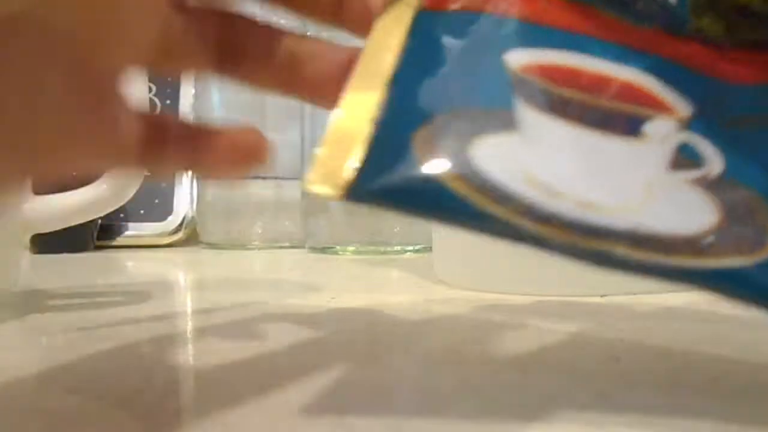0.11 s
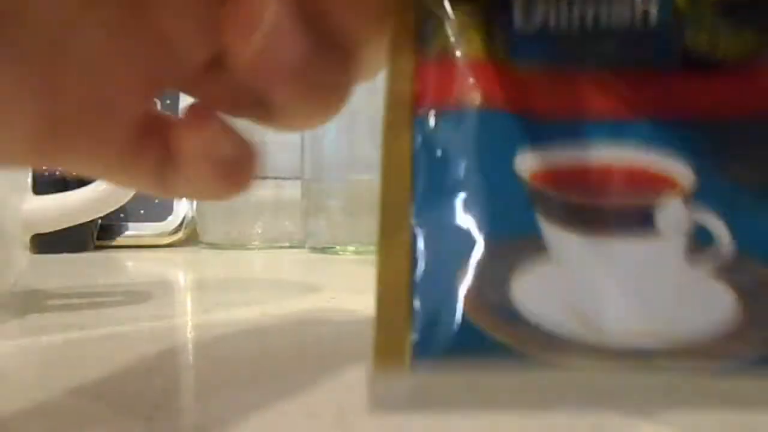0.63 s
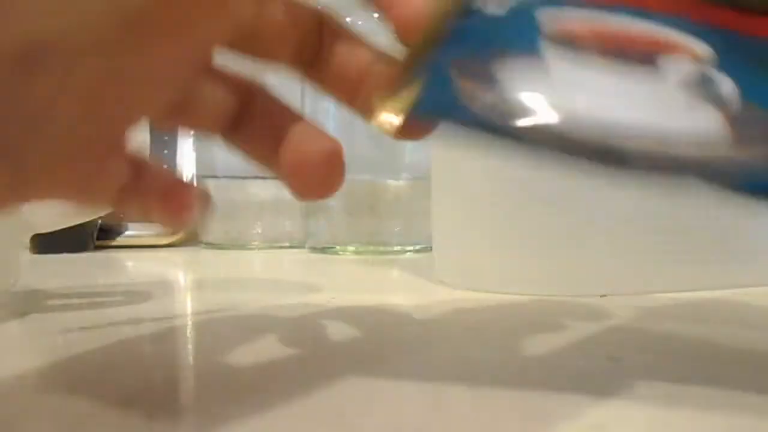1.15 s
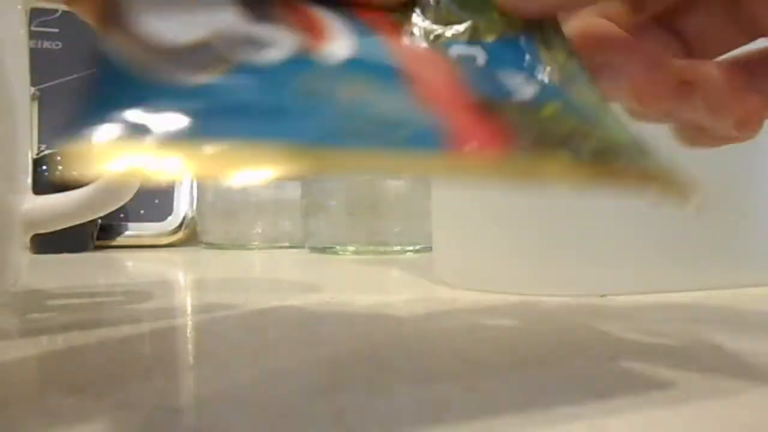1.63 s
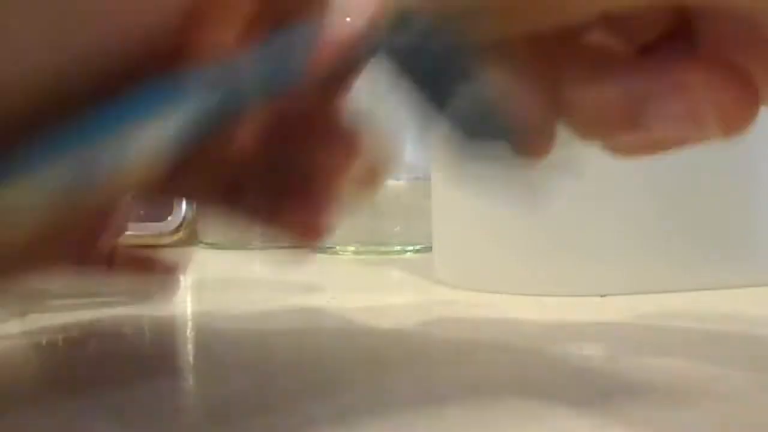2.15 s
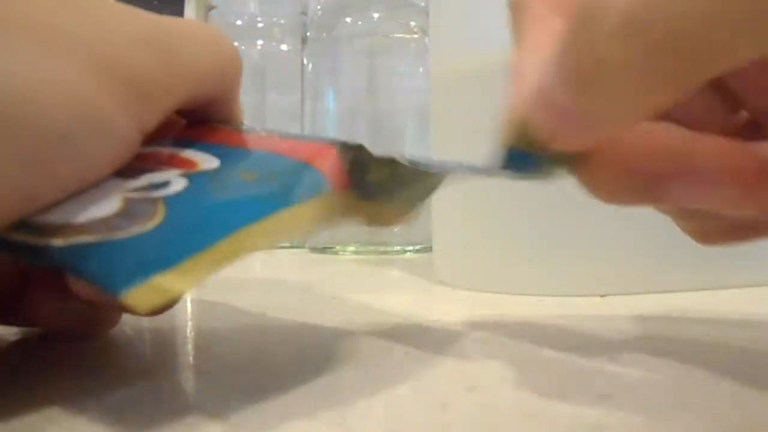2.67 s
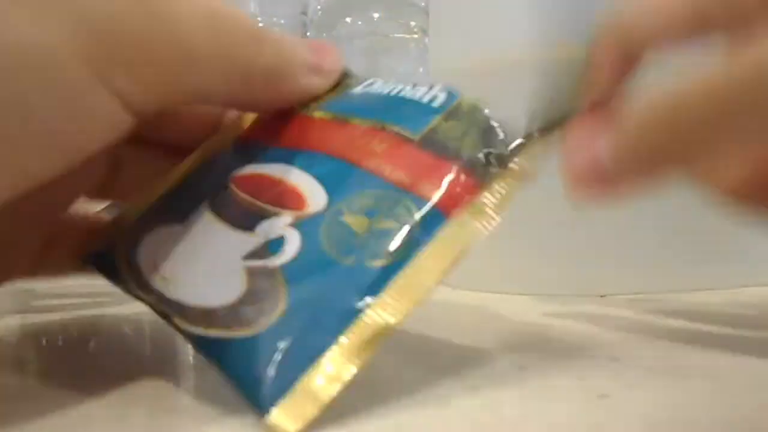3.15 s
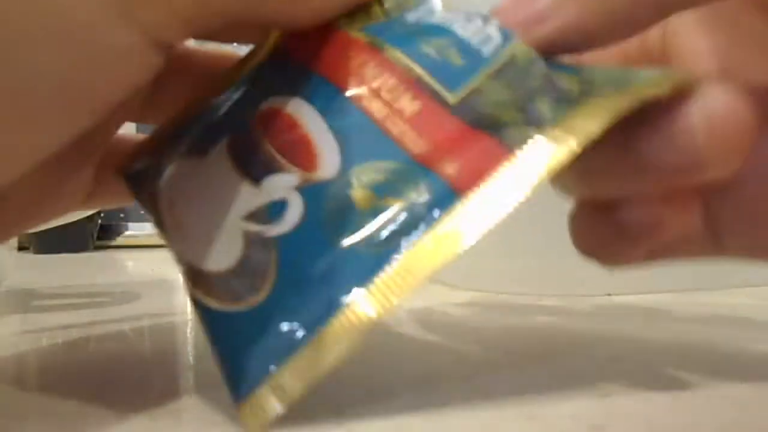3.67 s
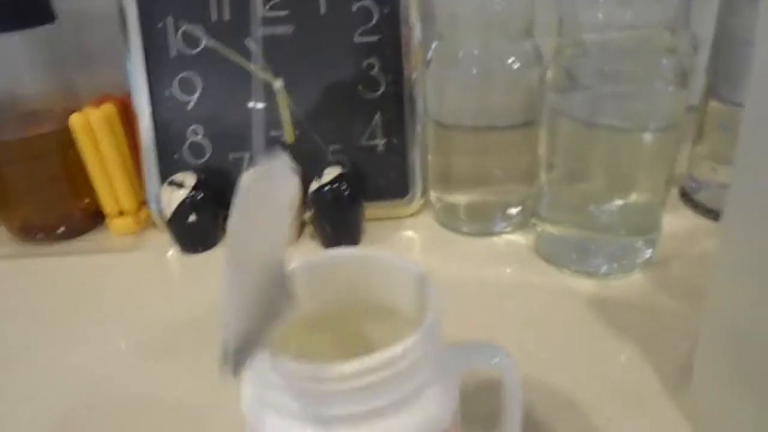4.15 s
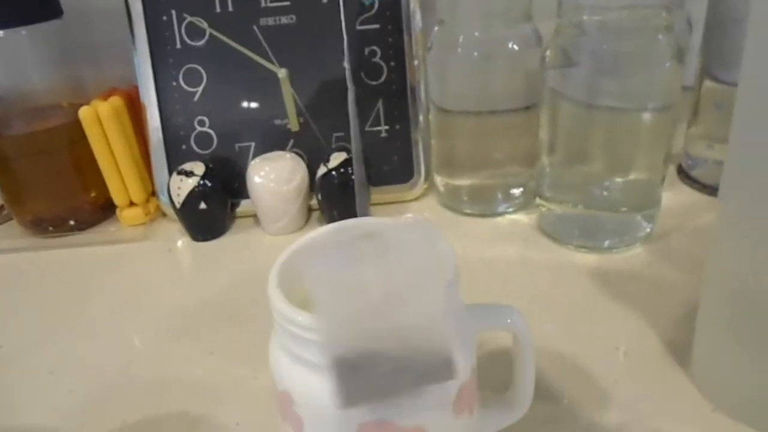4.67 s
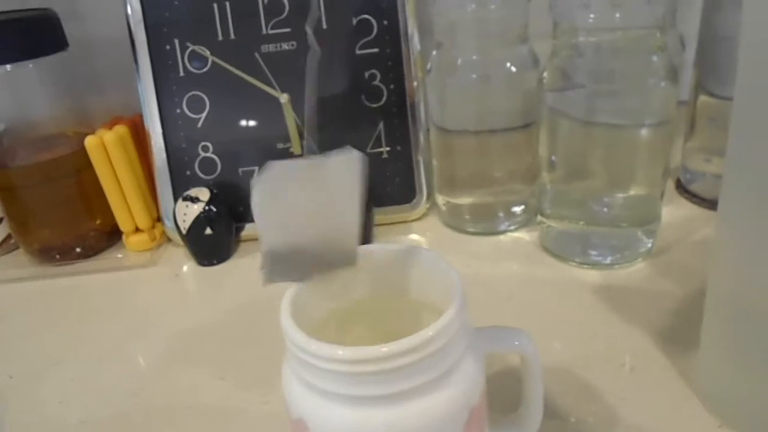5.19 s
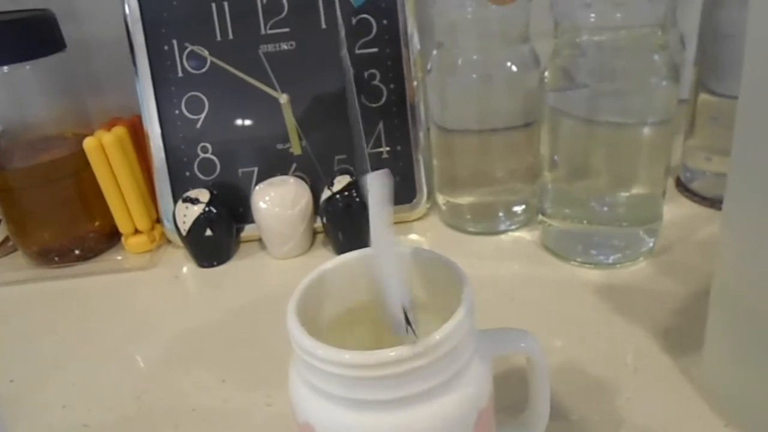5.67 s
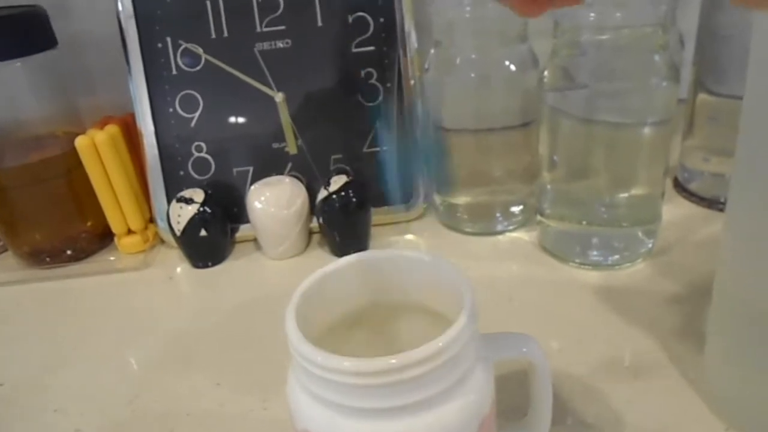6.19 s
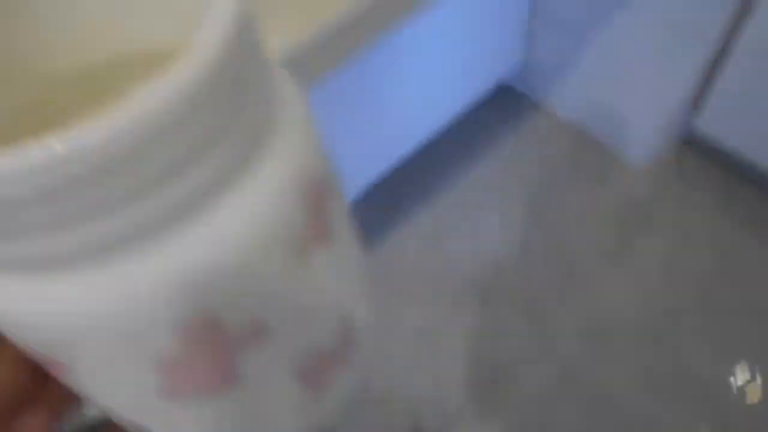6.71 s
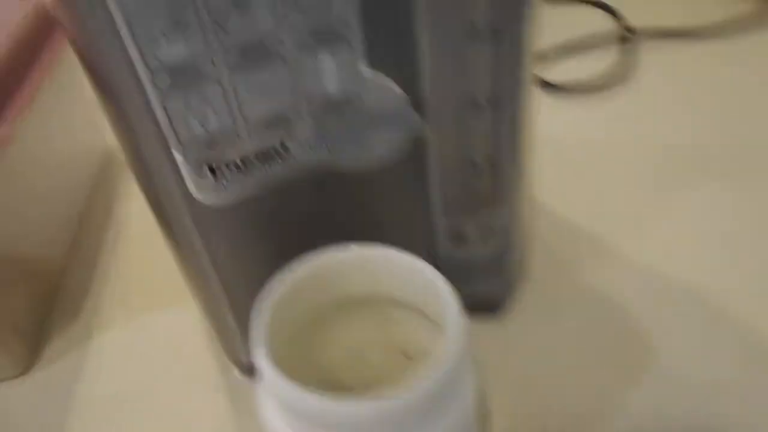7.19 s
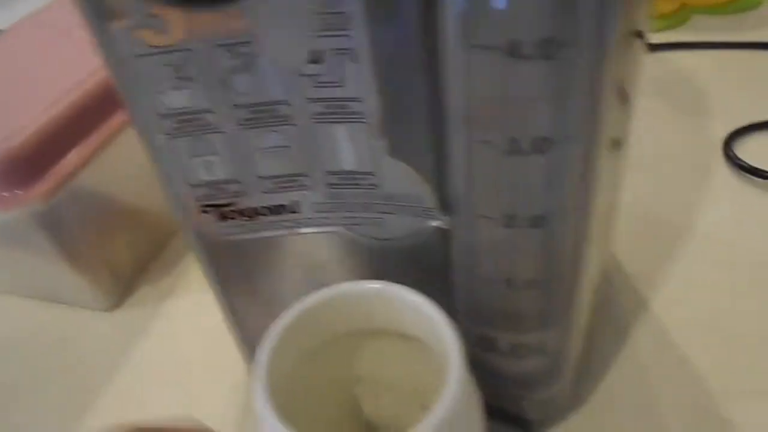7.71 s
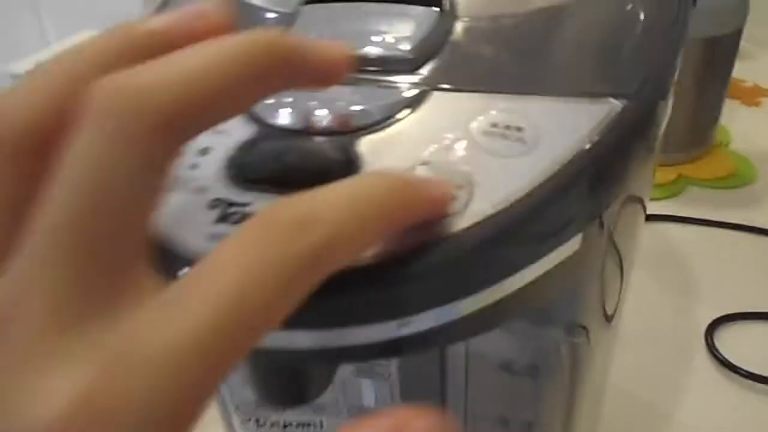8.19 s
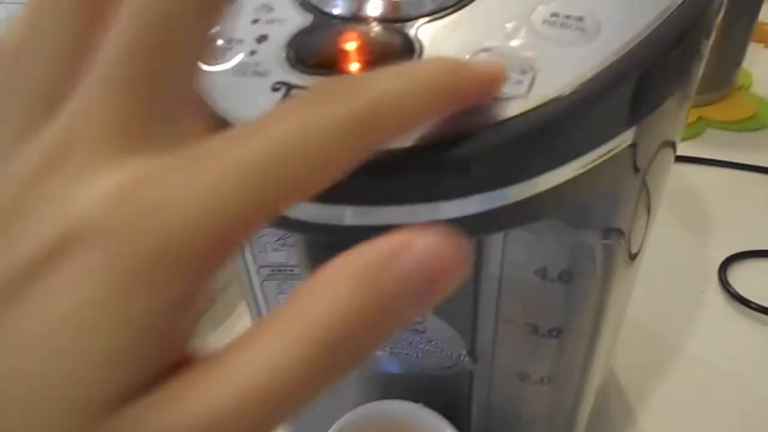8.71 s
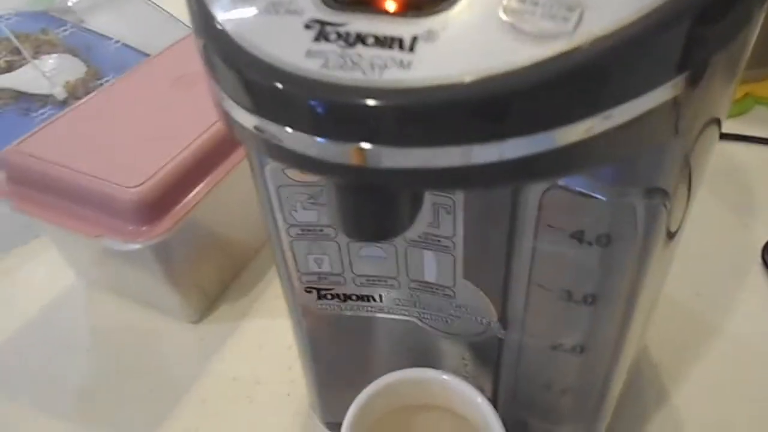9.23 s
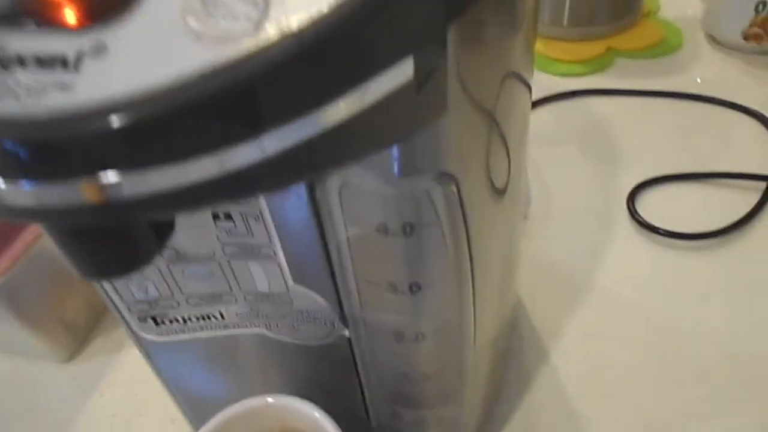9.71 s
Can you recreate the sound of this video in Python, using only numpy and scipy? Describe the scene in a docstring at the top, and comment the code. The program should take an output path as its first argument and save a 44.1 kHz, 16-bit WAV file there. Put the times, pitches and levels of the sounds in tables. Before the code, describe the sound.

Handheld close recording: dense, snapping foil crackles dominate the first half, ending in tearing bursts. A muffled thud from next door blooms and fades. Then it is mostly quiet room hiss, with light brushing, a pair of crisp tag ticks against a mug, a loud ceramic clack on the counter at arm's length, small button clicks, and a gritty mug slide ending in a double knock, with short tiled-room reverb.

```python
"""First a steady hiss over fridge hum in a tiled kitchen, then a foil packet of tea turned and torn at the microphone.
Creases snap as short coloured noise bursts over a smeared rustle; a dull noise swell is a knock in the next room.
Then a paper tag ticks into a stoneware mug, which is set down, rocks and slides: struck and ground resonances.
Buttons click as small bursts, a clock rattles its case, and a decaying noise tail gives the hard-walled room."""
import sys
import numpy as np
from scipy import signal
from scipy.fft import rfft, irfft
from scipy.io import wavfile
from scipy.ndimage import uniform_filter1d

SR = 44100
rng = np.random.default_rng(int(sys.argv[2]) if len(sys.argv) > 2 else 0)


def undo_db(level):
    """Turn decibels back into plain size, where 20 dB means ten times bigger."""
    steps = np.asarray(level, float) / 20
    return 10 ** steps


def to_wav(sig):
    """Store sig (one row per channel, or 1-D mono) as 16-bit WAV at the path in sys.argv[1].

    Samples outside -1..1 are clipped; the rate is SR.
    """
    pcm = np.clip(np.atleast_2d(sig), -1, 1) * 32767
    pcm = np.round(pcm).astype(np.int16)
    wavfile.write(sys.argv[1], SR, pcm.T)  # frames by channels


N = 434385
T = np.arange(N) / SR


def colour(x, points):
    """Shape the spectrum along the last axis by (frequency [Hz], level [dB]) points."""
    hz, db = np.transpose(points)
    f = np.fft.rfftfreq(x.shape[-1], 1 / SR) + 1
    gain = undo_db(np.interp(np.log(f), np.log(hz), db))
    return irfft(rfft(x) * gain, x.shape[-1])


def unit(x):
    """Scale to rms 1."""
    return x / np.sqrt(np.mean(x ** 2))


def band(x, hz, width):
    """Pass one resonance, its centre and width in Hz."""
    return signal.lfilter(*signal.iirpeak(hz, hz / width, SR), x)


def gains(spans):
    """Gain per sample for each dB column of a list of (time, dB, ..) tables; -200 dB outside each."""
    out = 0
    for rows in spans:
        s, *columns = np.transpose(rows)
        out = out + np.array([undo_db(np.interp(T, s, c, left=-200, right=-200)) for c in columns])
    return out


def swells(rows):
    """Gain per sample for each dB column of (start, length, dB, ..) rows: every stroke swells and fades."""
    out = 0
    for s, length, *db in rows:
        stroke = np.sin(np.pi * np.clip((T - s) / length, 0, 1)) ** 2
        out = out + stroke * undo_db(np.array(db))[:, None]
    return out


def place(times, sounds):
    """Lay short sounds on the time line."""
    out = np.zeros(N + sounds.shape[1])
    for s, sound in zip(times, sounds):
        out[int(s * SR):int(s * SR) + len(sound)] += sound
    return out[:N]


def place_at_peaks(times, peaks_db, sounds):
    """Lay short sounds on the time line, each scaled to its own peak level."""
    scale = undo_db(peaks_db) / abs(sounds).max(axis=1)
    return place(times, sounds * scale[:, None])


def ring(modes, x):
    """Excite decaying (Hz, dB, t60) modes; neighbours swing in opposite directions."""
    out = 0
    for k, (hz, db, t60) in enumerate(modes):
        pole = np.exp(2j * np.pi * hz / SR - np.log(1000) / (t60 * SR))
        mode = signal.lfilter([1, -1], [1, -pole], x).imag / abs(1 - pole)
        out = out + (-1) ** k * undo_db(db) * mode
    return out


def grit(rate, scatter_db):
    """Random clicks, rate per second, of widely spread but bounded size, rms 1."""
    chance = rng.random((N, 2)).T
    size = np.minimum(-np.log(1 - chance[1]), 3)
    sign = np.sign(rng.standard_normal(N))
    return unit((chance[0] < rate / SR) * undo_db(scatter_db * size) * sign)


# Spectrum of the room hiss: (frequency [Hz], level [dB])
HISS_COLOUR = [(12, -38), (20, 12), (43, -20.5), (92, 4.5), (213, -3.5), (401, -2.5), (679, -7.5),
               (861, -4), (1280, -6.5), (2600, -12), (3800, -10.5), (6000, -13.5), (9400, -14),
               (10300, -22)]
# Hiss over time: (time [s], level [dB], treble against bass [dB])
HISS_LEVELS = [(0, -55, 4), (1.3, -61, -13), (1.7, -59, -2.5), (3.4, -58.5, -2), (4, -58, 6), (4.6, -59, 2),
               (6.402, -62, 6.5), (7.9, -61.5, 1.5), (9.85, -56, -1.5)]


def hiss():
    """Steady coloured noise whose level and treble, split gently around 1.5 kHz, drift."""
    s, level_db, treble_db = np.transpose(HISS_LEVELS)
    noise = unit(colour(rng.standard_normal(N), HISS_COLOUR))
    bass = signal.lfilter(*signal.butter(1, 1500, fs=SR), noise)
    treble = undo_db(np.interp(T, s, treble_db)) * (noise - bass)
    return undo_db(np.interp(T, s, level_db)) * (bass + treble)


# Fridge resonances: (frequency [Hz], width [Hz], level early on [dB], level later [dB])
FRIDGE = [(88.4, 11, -69, -76.5), (397, 15, -69.5, -74.5), (488, 25, -77, -69.5),
          (289.4, 35.8, -75.5, -68.5), (4740, 290, -71.5, -71)]
# The hum moves from its early to its later balance: (start [s], end [s])
HUM_SHIFT_S = (6, 7.1)


def fridge():
    """Narrow noise resonances whose levels shift from the early balance to the later one."""
    out = 0
    for hz, width, early_db, later_db in FRIDGE:
        level = undo_db(np.interp(T, HUM_SHIFT_S, (early_db, later_db)))
        out = out + level * unit(band(rng.standard_normal(N), hz, width))
    return out


# The phone moving in the hand: (start [s], length [s], top level [dB])
RUMBLE = [(3.98, 0.44, -53.5), (4.35, .5, -61), (5.28, 0.19, -69), (6.75, .2, -62), (7.18, 0.2, -58)]


def hand_rumble():
    """Noise passed twice through a 25 Hz resonance, swelling with each movement of the hand."""
    return swells(RUMBLE)[0] * unit(band(band(rng.standard_normal(N), 25, 37.4), 25, 37.4))


# Hard-walled kitchen: (frequency [Hz], decay by 60 dB [s])
KITCHEN_T60 = [(200, 1), (530, 0.43), (1400, 0.69), (3700, 0.29), (9700, 0.14)]


def kitchen(x):
    """Diffuse tail of hard walls, each band of noise dying at its own rate, the top soonest."""
    t, tail = np.arange(SR) / SR, 0
    known_hz, known_t60 = np.transpose(KITCHEN_T60)
    for hz in 125 * 2 ** np.arange(0, 6.6, .5):
        t60 = np.interp(np.log(hz), np.log(known_hz), known_t60)
        tail = tail + band(rng.standard_normal(SR), hz, hz / 3) * undo_db(-60 * t / t60)
    tail *= 1 - np.exp(-t / 0.0018)  # soft onset
    return signal.fftconvolve(x, tail / np.sqrt(np.sum(tail ** 2)))[:N]


KNOCK_S, KNOCK_DB, KNOCK_T60_S = 4.013, -29, 0.64
# Spectrum of the knock next door: (frequency [Hz], level per Hz [dB])
KNOCK_COLOUR = [(35, -39), (60, -14), (140, -11), (194, -19.5), (500, -8.5), (606, -16), (749, -7),
                (1240, -20), (1820, -24), (6000, -40), (7800, -38), (13200, -120)]


def knock():
    """Heard through a doorway: dull noise enters at half strength, swells and dies with the far room."""
    t = np.clip(T - KNOCK_S, 0, None)
    shape = (t > 0) * (1 - .5 * np.exp(-t / 0.045)) * undo_db(-60 * t / KNOCK_T60_S)
    return undo_db(KNOCK_DB) * shape * unit(colour(rng.standard_normal(N), KNOCK_COLOUR))


# Clock ticks: (time [s], peak level [dB])
CLOCK_TICKS = [(4.463, -39.5), (5.465, -38), (6.44, -37)]
# Plastic clock case: (frequency [Hz], level [dB], decay by 60 dB [s])
CLOCK_MODES = [(1950, -3, .01), (3600, -1, .01), (4900, -3, .008), (6000, -6, .006)]


def clock():
    """A wall clock's step rattles a few short resonances of its plastic case."""
    s, db = np.transpose(CLOCK_TICKS)
    t = np.arange(3000) / SR
    rattle = np.exp(-t / 0.0056) * rng.standard_normal((len(s), len(t)))
    return place_at_peaks(s, db, ring(CLOCK_MODES, rattle))


# A thin ring that swells and fades: (start [s], length [s], top level [dB], frequency [Hz])
THIN_RING = [(6.44, 0.26, -61, 6130), (8.48, 0.17, -60.5, 5930)]


def thin_ring():
    """A narrow wavering band near 6 kHz: slow noise on a cosine and a sine."""
    flutter = unit(uniform_filter1d(rng.standard_normal((2, N)), 150))
    out = 0
    for s, length, db, hz in THIN_RING:
        phase = 2 * np.pi * hz * T
        tone = flutter[0] * np.cos(phase) + flutter[1] * np.sin(phase)
        out = out + swells([(s, length, db)])[0] * tone
    return out


# Edges of the four bands that colour a snap [Hz]
BAND_EDGES_HZ = np.array([300, 1500, 3500, 6500, 10000])


def snaps(rows, rise_s, fall_s, tail_s, tail_db):
    """Each snap builds up and flips in a ragged burst, longer for a big one, then flutters on briefly."""
    rows, lead = np.array(rows), 256 / SR
    t = np.arange(2048) / SR - lead
    # falls and tails last as given at a 0 dB peak
    after = np.clip(t, 0, None) / undo_db(0.16 * rows[:, 1:2])
    fall = np.exp(-after / fall_s) + undo_db(tail_db) * np.exp(-after / tail_s)
    shape = np.where(t < 0, np.exp(-abs(t) / rise_s), fall)
    bursts = shape * rng.standard_normal((len(rows), len(t)))
    centre = np.sqrt(BAND_EDGES_HZ[1:] * BAND_EDGES_HZ[:-1])
    # the 3.5-6.5 kHz band is the 0 dB reference
    per_hz = np.insert(rows[:, 2:], 2, 0, axis=1) - 10 * np.log10(np.diff(BAND_EDGES_HZ))
    bursts = np.array([colour(b, [(120, d[0] - 18), *zip(centre, d)]) for b, d in zip(bursts, per_hz)])
    return place_at_peaks(rows[:, 0] - lead, rows[:, 1], bursts)


# Small ticks of tag, string, fingers and buttons: (time [s], peak level [dB], then against 3.5-6.5 kHz:
# 300-1500 Hz [dB], 1.5-3.5 kHz [dB], 6.5-10 kHz [dB])
TICKS = [(4.5162, -30.5, -3, -14, -3), (4.602, -36, -11, -2, 3), (6.279, -12.5, -18, -13.5, 6),
         (6.3599, -8, -20, -8, 19), (8.2424, -41, -5, -5, 12), (8.2771, -42, 1, 8, 7),
         (8.33, -39.5, -4, -1, -12), (8.5969, -37, -14, 1, -4.5), (8.6219, -28, -8, 5, -5),
         (8.6349, -23.5, 0, -18, 4), (8.6482, -30.5, 2.5, -1, -3), (8.7529, -15.5, -3.5, -14, 8.5),
         (8.8888, -28, -22, 2, 2), (9.553, -30.5, -20, -19, 10), (9.558, -43, -20, -15, 9),
         (9.563, -39, -19, -12, 19), (9.568, -33, -25, -7, 5)]


def small_ticks():
    """Light contacts, each a short coloured noise burst with a fluttering tail."""
    return snaps(TICKS, rise_s=0.00068, fall_s=0.00166, tail_s=0.0061, tail_db=-12.5)


# Stoneware mug wall: (frequency [Hz], level [dB], decay by 60 dB [s])
MUG = [(3165, 0, .15), (3292, 0, .2), (7727, 0, .14), (7919, -18, .12), (7330, -19, .2), (7830, 0, .045),
       (8930, -8, .13)]
# Counter top under the mug: (frequency [Hz], level [dB], decay by 60 dB [s])
COUNTER = [(400, -20, .015), (569, 7, 0.026), (700, -4.5, 0.0085), (830, 6, 0.011), (1080, 4.5, .025),
           (1183, 5, .022), (1448, 0.5, 0.021), (1680, 3.5, .018), (1904, -2.5, 0.024), (2085, 4, .028),
           (2450, -25, .01), (2760, -26, .008)]
# Blows on the mug: (time [s], peak level of the counter [dB], drive of the first wall mode [dB],
# of the second [dB], of the 7.7 and 7.9 kHz pair [dB], of the other three [dB])
BLOWS = [(6.28, -50, -46, -45, -57, -34), (6.358, -55, -53, -53, -44, -41),
         (7.251, -0.5, -40, -21.5, -9.5, -47), (7.2994, -8, -36, -51, -30, -54),
         (7.327, -39, -52, -62, -47, -63), (7.341, -29, -53, -62, -37, -61),
         (7.411, -22, -57, -51, -34, -57), (7.427, -22.5, -54, -56, -41, -54),
         (7.446, -10.5, -40, -37, -25, -51), (9.654, -16.5, -37, -58, -50.5, -27.5),
         (9.661, -10, -37, -42, -52, -27), (9.682, -17, -33.5, -58, -55, -55)]


def mug_blows():
    """Each blow rattles the counter and taps the wall, later ones crack; its row balances the modes."""
    rows, t = np.array(BLOWS), np.arange(12000) / SR
    # the heavy counter takes the blow and keeps rattling
    rattle = np.exp(-t / 0.004) * rng.standard_normal((len(rows), len(t)))
    counter = place_at_peaks(rows[:, 0], rows[:, 1], ring(COUNTER, undo_db(24.5) * (t == 0) + rattle))
    # the hard wall gets one clean tap
    groups = MUG[:1], MUG[1:2], MUG[2:4], MUG[4:]
    taps = np.array([ring(modes, 1. * (t == 0)) for modes in groups])
    wall = place(rows[:, 0], undo_db(rows[:, 2:]) @ taps)
    # from the third blow on, a crack 20 dB under the counter's peak
    cracks = [(s + 0.00072, db - 20, 6, 4, -4) for s, db, *_ in BLOWS[2:]]
    return counter, wall, snaps(cracks, rise_s=0.00033, fall_s=0.0014, tail_s=.003, tail_db=-18)


# Mug grinding on its foot: (start [s], length [s], top level of the counter [dB],
# of the first wall mode [dB], of the 7.83 kHz wall mode [dB])
SLIDE = [(6.764, 0.11, -86, -64, -84), (6.892, 0.047, -69, -58.5, -63), (7.395, 0.058, -30, -61, -37.5),
         (7.804, 0.064, -72, -64, -80), (9.146, 0.076, -43, -64, -56), (9.181, 0.041, -33, -60.5, -49),
         (9.212, 0.055, -38.5, -54, -55), (9.275, 0.073, -69, -70, -67), (9.396, 0.034, -48.5, -81, -54),
         (9.414, 0.12, -50.5, -73, -50.5), (9.522, 0.072, -55, -48.5, -53), (9.605, 0.076, -52, -62, -52)]


def mug_slide():
    """The foot grinds softly: gritty force, holding little outside the modes it drives."""
    slide = []
    for level, modes, hz in zip(swells(SLIDE), [COUNTER, MUG[:1], MUG[5:6]], [950, MUG[0][0], MUG[5][0]]):
        force = band(band(grit(1500., 1.9), hz, hz), hz, hz)
        slide.append(ring(modes, level * force) / np.std(ring(modes, force)))
    return slide[0], slide[1] + slide[2]


def mug():
    """Blows and grinding ring the same wall and counter modes; a thin top radiates no deep bass."""
    counter, wall, cracks = mug_blows()
    counter_slide, wall_slide = mug_slide()
    no_bass = signal.butter(2, 230, "high", fs=SR, output="sos")
    return signal.sosfilt(no_bass, counter + counter_slide), wall + wall_slide, cracks


# Soft brushing of paper and fingers: (start [s], length [s], top level [dB])
BRUSH = [(4.42, 0.14, -53.5), (5.3, 0.084, -56.5), (5.52, 0.069, -58), (5.64, .12, -58.5),
         (5.89, 0.047, -54.5), (8.17, 0.1, -58.5)]


def brushing():
    """Widely uneven high grit that swells and fades with each stroke."""
    brush = band(band(grit(3500.0, 7.2), 9700, 4000), 7600, 5000)
    return swells(BRUSH)[0] * unit(brush)


# Resonances of the held packet: (frequency [Hz], width [Hz], level [dB])
HOLLOW = [(2050, 240, -6.5), (3360, 1000, -7)]
# Hiss in the hollow over time: (time [s], level [dB])
HOLLOW_LEVELS = [(.45, -78), (.6, -48.5), (.9, -51), (1.05, -48), (1.15, -81)]


def hollow_air():
    """Air hissing in the hollow of the held packet: noise through two resonances."""
    air = 0
    for hz, width, db in HOLLOW:
        air = air + undo_db(db) * unit(band(band(rng.standard_normal(N), hz, width), hz, width))
    return gains([HOLLOW_LEVELS])[0] * air


# Foil sliding between fingers: (time [s], level [dB], level of the low puffs [dB])
RUSTLE = [(0.3, -80, -59.5), (0.51, -50.5, -53), (0.81, -54.5, -56.5), (1.07, -50, -55.5),
          (1.23, -52.5, -70.5), (1.42, -48.5, -53), (1.6, -60.5, -77.5), (1.8, -52, -71),
          (2.05, -55.5, -62.5), (2.26, -53, -68), (2.5, -54.5, -62), (2.7, -44, -54), (2.93, -66.5, -96),
          (3.18, -40.5, -55), (3.33, -91, -90), (3.59, -68, -69), (3.74, -55.5, -57), (4.0, -70, -83)]
# Fists of foil crushed at once: (start [s], length [s], level [dB], level of the low puffs [dB])
CRUMPLES = [(0.217, 0.098, -51, -61), (0.786, 0.048, -53, -64), (1.096, 0.054, -42.5, -43.5),
            (1.136, 0.033, -28.5, -42), (1.261, 0.028, -47.5, -58), (1.542, 0.041, -42.5, -52.5),
            (1.901, 0.025, -35, -47), (2.02, 0.036, -42.5, -47.5), (2.178, 0.06, -35.5, -41.5),
            (2.425, 0.012, -30.5, -44), (2.685, 0.043, -40, -70), (3.1, 0.012, -23.5, -43.5),
            (3.234, 0.059, -48, -53.5), (3.55, 0.055, -45, -56), (3.608, 0.089, -40.5, -57.5),
            (3.91, 0.018, -43.5, -51), (3.945, 0.027, -33, -51)]
# Spectrum of the creasing foil: (frequency [Hz], level [dB])
FOIL = [(400, -7.5), (1500, -1.5), (3500, 9), (6000, 10), (7000, 9), (9300, 11), (10300, -1)]


def rustle():
    """Dense tiny creases between the loud ones, smeared by the sheet; the air inside puffs lower."""
    crushed = gains([[(s, a, b), (s + length, a, b)] for s, length, a, b in CRUMPLES])
    high, low = gains([RUSTLE]) + uniform_filter1d(crushed, size=300)
    smear = signal.lfilter([1], [1, -np.exp(-1 / (0.001 * SR))], abs(grit(1700.0, 2.1)))  # 1 ms decay
    creases = smear * rng.standard_normal(N)
    puffs = band(band(grit(1500., 2.3), 970, 2400), 480, 2500)
    return high * unit(colour(creases, FOIL)) + low * unit(puffs)


# Bouts of handling: (start [s], length [s], usual peak level of a small snap [dB])
BOUTS = [(0.24, 0.038, -41), (0.482, 0.1, -28), (0.65, 0.22, -23), (1.084, 0.11, -38), (1.309, 0.16, -23),
         (1.757, 0.23, -21.5), (1.977, 0.32, -22.5), (2.527, 0.24, -31), (3.109, 0.13, -21),
         (3.62, 0.1, -28.5), (3.757, 0.23, -29)]
# Usual colour of a small snap against 3.5-6.5 kHz: (300-1500 Hz [dB], 1.5-3.5 kHz [dB], 6.5-10 kHz [dB])
SMALL_BANDS_DB = (-11, -3, -0.5)
SMALL_PER_S, SMALL_LEVEL_SCATTER_DB, SMALL_BAND_SCATTER_DB = 50, 4.5, 5.5


def small_snaps():
    """Rows of chance snaps inside the bouts of handling, scattered in level and colour."""
    rows = []
    when, chance = rng.random((len(BOUTS), 20)), rng.standard_normal((len(BOUTS), 20, 4))
    for (s, length, db), u, c in zip(BOUTS, when, chance):
        count = round(SMALL_PER_S * length)
        peak_db = db + SMALL_LEVEL_SCATTER_DB * c[:, 0]
        bands_db = SMALL_BANDS_DB + SMALL_BAND_SCATTER_DB * c[:, 1:]
        rows += list(np.c_[s + length * u, peak_db, bands_db][:count])
    return rows


# Loud creases snapping close to the microphone: (time of the peak [s], peak level [dB],
# then against 3.5-6.5 kHz: 300-1500 Hz [dB], 1.5-3.5 kHz [dB], 6.5-10 kHz [dB])
SNAPS = [(0.5025, -17.5, -19, -13, 1), (0.5531, -14, -8, -6.5, -1), (0.6349, -2.5, -7, -7, -2),
         (0.6467, -4.5, -19.5, -7, -10), (0.7081, -3, -14, -24, 7), (0.717, 4, -18, -8, 1.5),
         (0.7294, 3, -36, -46, -0.5), (0.7583, -8, -10, 20, 26), (0.7799, 6.5, -15, -13, 0),
         (0.9097, -16, -24, -9, -11), (0.9429, -13.5, -26, -5, 5.5), (0.9717, -15.5, -17, -6, 2),
         (1.0342, -8, -25, 4, 7), (1.0558, -11.5, -17, -7, 3), (1.0717, 0.5, -23, 1, 0),
         (1.1006, -18, -31, -30, -16), (1.1223, -6, 2, 14.5, 16), (1.1366, -18, -5, 17, 6),
         (1.1443, -10.5, 21, 2.5, 12), (1.1715, -6.5, 0, 10, 8), (1.2102, -16, -18, -10, -12),
         (1.218, -11.5, -12, -9, -6), (1.3063, -6.5, -16.5, -10.5, 0), (1.3209, -3, -10, -3, 3.5),
         (1.3273, -13, -22, -11, -11.5), (1.376, -3.5, -22.5, -10, 5.5), (1.3971, -17.5, -2.5, -3, 0.5),
         (1.4178, -15, -1, 5, 4), (1.5001, -10.5, -18.5, -4.5, -9.5), (1.5177, -16.5, -24, -17, -5.5),
         (1.5521, -8, -36, 2, 1), (1.5634, 1.5, -30, -6.5, 7), (1.6037, -22, -20.5, -19, -10),
         (1.7479, -21, -27, 0, -6), (1.8344, 5.5, -7.5, -4, 9), (1.866, -14, -24.5, 7, -2),
         (1.8771, -1, -21, -15, -5), (1.9062, -11, -16, -14, -25.5), (1.9159, -13, -17, 3, -3),
         (1.9908, -13.5, -5, -9, -4), (2.0235, -8.5, -39, -23, -1.5), (2.0325, -16.5, -19, 46, 6),
         (2.0538, 1, -8, -3, 8), (2.061, -12.5, -19, -14.5, -12), (2.0857, -4.5, -39, -20, 1),
         (2.1089, -12, -28, -22, 46), (2.1339, -8.5, -22, -16, -16), (2.1421, -12.5, -31, -18, 27),
         (2.168, -12.5, -26, 1, -41), (2.1812, -3.5, -28.5, -30, 34), (2.1908, -2.5, -28, -1, 14.5),
         (2.2137, -0.5, -18.5, -10.5, 5), (2.272, -14.5, -42, -17, -5), (2.3236, -21.5, -11, -7, -15),
         (2.3506, -16.5, -34, -2, 8), (2.4306, -48, 34.5, -13.5, -32.5), (2.5094, -25, -40, -14, -9),
         (2.5364, -16.5, -13, -10, -14), (2.5612, -7, -20.5, -8.5, 0), (2.5723, -8, -6, -9, 4),
         (2.6093, -6.5, -13.5, -11, 6), (2.6467, 3, -38, -16, 5.5), (2.6774, -13, -26, -9, 2),
         (2.6945, -8.5, -24, 3, 17), (2.7068, -2, -22, 1, 15), (2.7262, -3.5, -28, -4, 21),
         (2.7412, 2.5, -27, -6, 11), (2.8072, -7, -21.5, -9, -2.5), (2.8232, -21, -22, -3, -8),
         (2.8459, -5, -33, -7.5, 1.5), (2.8818, -27, -6, -12, -7.5), (2.9495, -24, -28, -2, -1),
         (3.0006, -12, -17, 8.5, 8), (3.0252, -26.5, -19, 1, -17), (3.1059, -1.5, -17, -1, 9.5),
         (3.168, 0, -39, -13, 3.5), (3.2422, -7, -14.5, -12, 2), (3.2475, -4.5, -12, 10, 25),
         (3.2555, -11, -17, -6, 1.5), (3.2776, -15, 4, 4, 6), (3.3221, -24, -13, -9, 0.5),
         (3.5951, -14.5, -16, -4, -9.5), (3.6519, -16.5, -33, -7, -12), (3.7794, -4.5, -39, -12, -11),
         (3.8441, -22.5, -6, -8, 23), (3.9441, -18, -16, -19, 10), (3.9686, -9, -8, -7, 6.5)]


def packet_snaps():
    """Creases of the foil build up, flip and flutter, loud ones and chance small ones."""
    return snaps(SNAPS + small_snaps(), rise_s=0.0004, fall_s=0.0011, tail_s=0.0066, tail_db=-24)


def scene():
    """The packet is at the microphone, the mug an arm's length off and so wetter."""
    background = hiss() + fridge() + hand_rumble()
    ticks = small_ticks() + clock()
    counter, wall, cracks = mug()
    packet = packet_snaps() + rustle() + hollow_air() + brushing()
    send = undo_db(-26) * packet + undo_db(-10.0) * ticks
    send = send + undo_db(-10.5) * counter + undo_db(-15) * wall + undo_db(-27.5) * cracks
    direct = packet + ticks + counter + wall + cracks
    return (direct + kitchen(send) + thin_ring() + knock() + background)[None]


def band_limit(x):
    """A steep low-pass at the top of the band."""
    return signal.sosfilt(signal.butter(12, 10910, fs=SR, output="sos"), x)


START_S, OVERLOAD, STOP_HZ = 0.072, 1.35, 10774


def record(dry):
    """The phone opens late, rounds the loudest peaks and cuts the top steeply."""
    opened = dry * (T > START_S)
    rounded = np.tanh(OVERLOAD * opened) / OVERLOAD
    steep = signal.cheby2(16, 62, STOP_HZ, fs=SR, output="sos")  # 62 dB down from STOP_HZ
    mix = signal.sosfilt(steep, rounded)
    return band_limit(mix)


dry = scene()
out = record(dry)
to_wav(out)
```